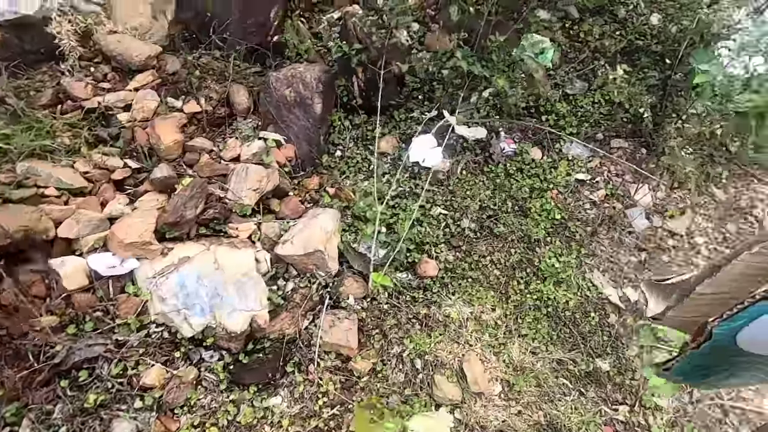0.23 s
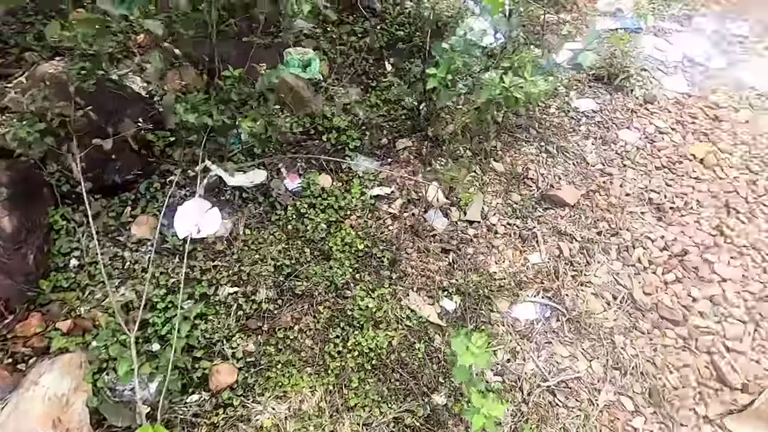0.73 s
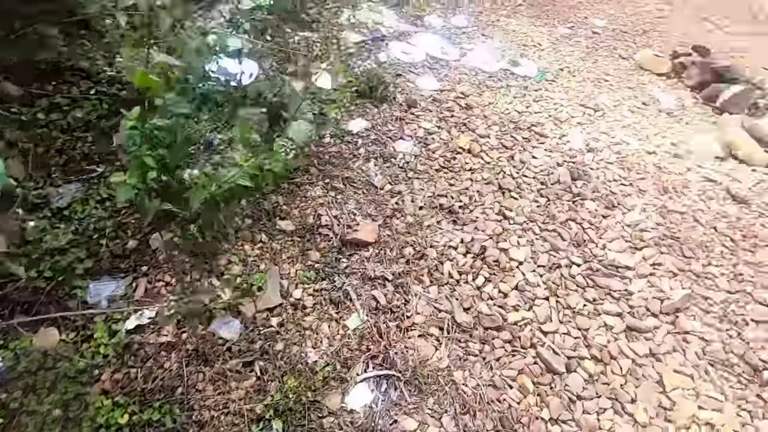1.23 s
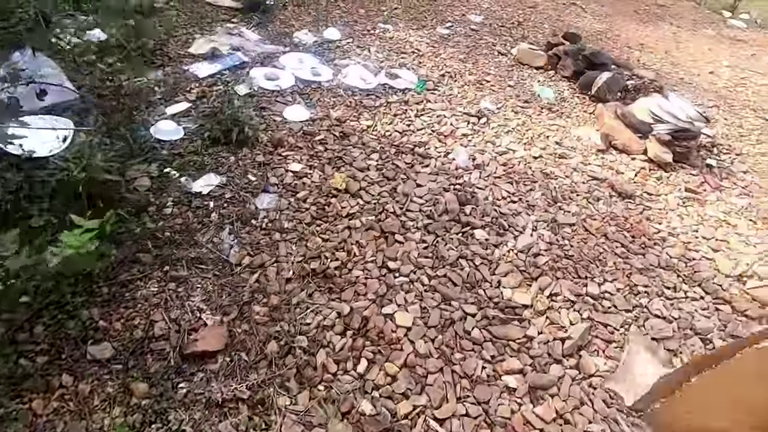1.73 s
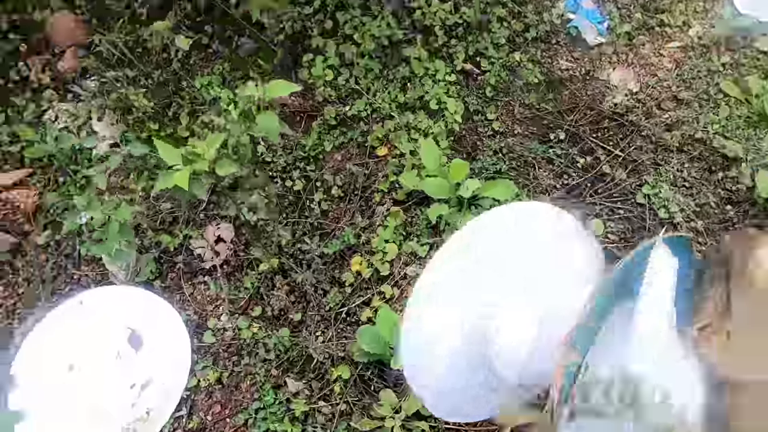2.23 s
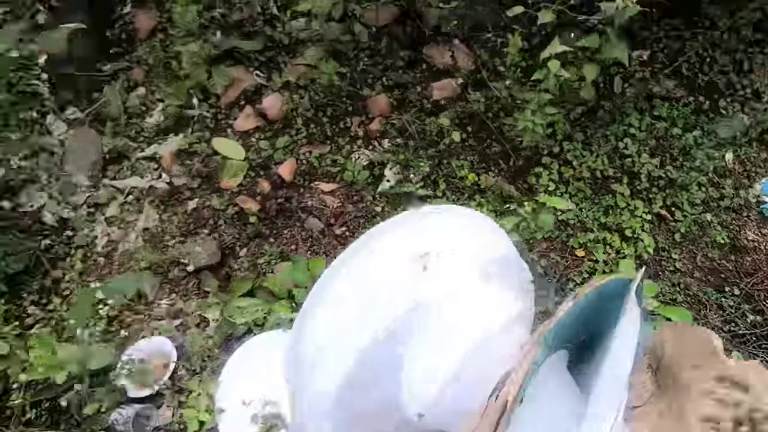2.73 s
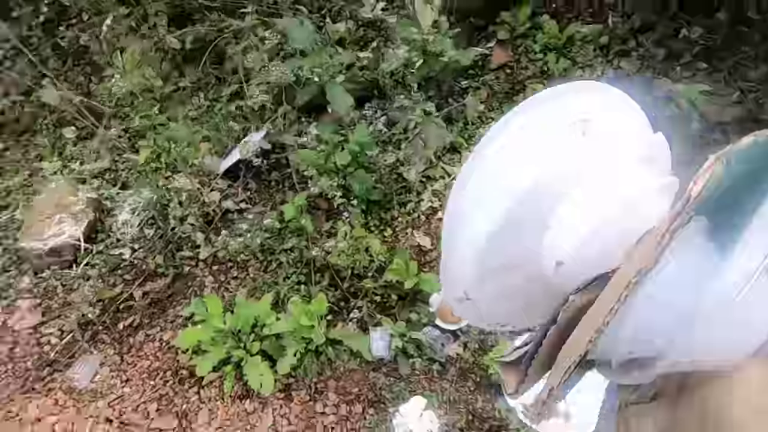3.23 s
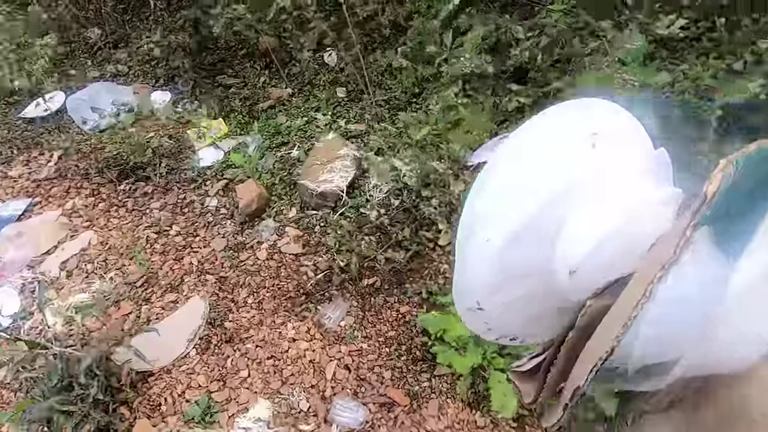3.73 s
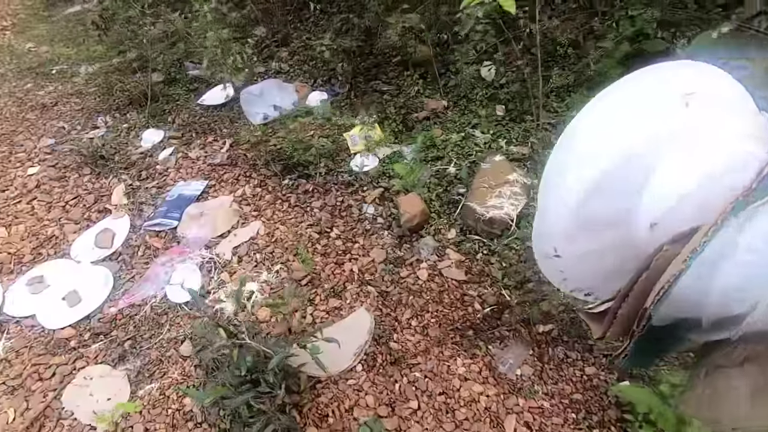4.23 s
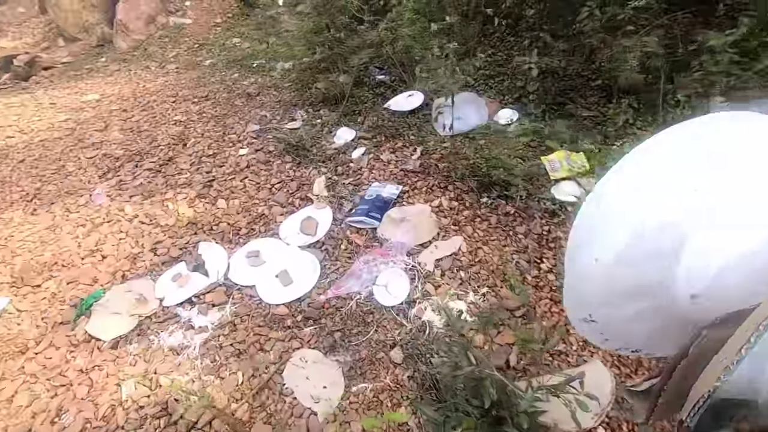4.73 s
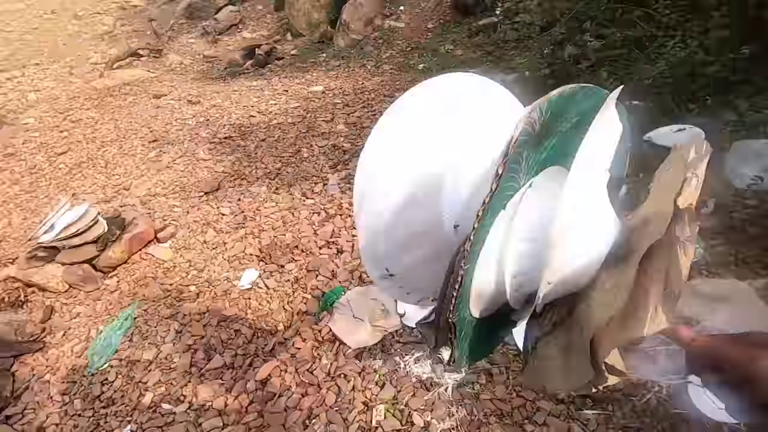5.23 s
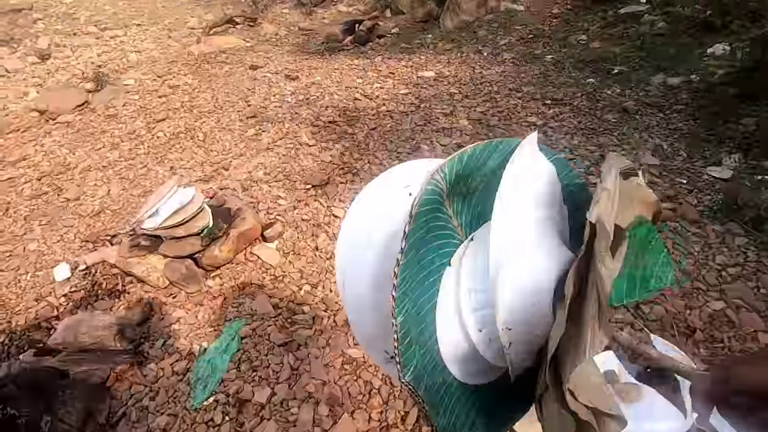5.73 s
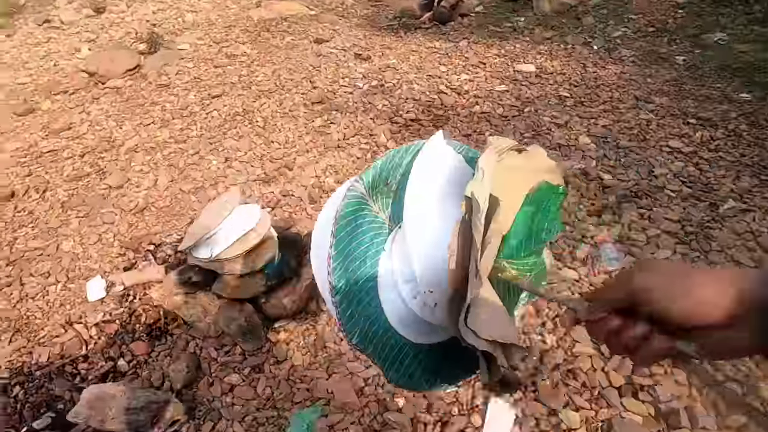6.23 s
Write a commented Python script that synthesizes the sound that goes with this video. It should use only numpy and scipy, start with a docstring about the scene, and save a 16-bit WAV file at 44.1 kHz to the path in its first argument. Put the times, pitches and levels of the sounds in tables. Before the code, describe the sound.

Someone walks on stony ground, faint at first, then crackling through litter and clacking stones, as wind thumps a small camera microphone.

```python
"""Footsteps over loose stones and weeds outdoors, someone carrying a stack of paper plates near a small camera.
Gravel grinds as small ringing grains and low noise; grit and paper crackle as denser, brighter showers.
Stones knock as decaying modes and grit snaps as short noise bursts.
Wind buffets the two microphone ports as low noise and single swings of pressure;
behind it lie a steady hiss and a faint whistle, likely a far bird."""
import sys
import numpy as np
from scipy import signal
from scipy.fft import rfft, irfft
from scipy.io import wavfile
from scipy.ndimage import uniform_filter1d

SR = 44100
rng = np.random.default_rng(int(sys.argv[2]) if len(sys.argv) > 2 else 0)


def int16_out(signal):
    """Quantize to a 16-bit WAV file."""
    q = np.round(np.clip(np.atleast_2d(signal).T, -1, 1) * 32767)
    wavfile.write(sys.argv[1], SR, q.astype(np.int16))


N = 286429


def amp(db):
    """Decibels to linear gain."""
    return 10 ** (np.asarray(db) / 20)


def evened(x):
    """Scale each channel to rms 1."""
    return x / np.sqrt(np.mean(x ** 2, -1, keepdims=True) + 1e-20)


def noise():
    """Two unrelated channels of white noise."""
    return rng.standard_normal((2, N))


def read(points, size=N):
    """Spectrum table on the bins of an FFT of this size, interpolated over log frequency."""
    f_hz, value = np.transpose(points)
    bins_hz = np.fft.rfftfreq(size, 1 / SR)
    return np.interp(np.log(bins_hz + 1), np.log(f_hz + 1), value)


def curves(rows):
    """Each column after the time as a curve over the samples."""
    s, *columns = np.transpose(rows)
    t = np.arange(N) / SR
    return [np.interp(t, s, c) for c in columns]


def coloured(x, points):
    """Shape the spectrum by a dB table, then set rms 1."""
    return evened(irfft(rfft(x) * amp(read(points)), N))


def flicker(hz, depth_db):
    """Random gain from noise low-passed at hz, mean power 1."""
    b, a = signal.butter(2, hz, fs=SR)
    slow = signal.lfilter(b, a, rng.standard_normal(N))
    return evened(amp(depth_db * evened(slow)))


def add(mix, s, sound):
    """Mix a sound in from time s, cut at the end."""
    part = mix[:, round(s * SR):][:, :len(sound.T)]
    part += sound[:, :len(part.T)]


def tread():
    """Stones grind in ringing grains, the bed gives under the weight, grit and paper crackle."""
    # relative spectra: (frequency [Hz], density [dB per Hz])
    grind_spectrum = [(310, -74), (520, -4), (843, -0.5), (1410, -6.5), (1840, -22), (2200, -26),
                      (2860, -42), (4840, -120)]
    weight_spectrum = [(82, -83), (140, 1), (274, -0.5), (340, -1), (409, -3.5), (560, -11), (730, -14),
                       (1230, -120)]
    crackle_spectrum = [(1000, -4.5), (1700, -3.5), (2160, -3.5), (3500, -6), (4530, -8), (6030, -11.5),
                        (7470, -5), (9070, -14), (10400, -13), (13900, -39), (15500, -43)]
    # finest rustle of paper and leaves: (frequency [Hz], relative density [dB per Hz])
    fizz_spectrum = [(8500, -7), (11500, -6.5), (14200, -15), (15500, -30)]
    grinding, crackling, giving = load()
    jolts = flicker(38, 1.4)  # the layers surge together as the load shifts

    stones = rattle(542, 1975, cycles=1.4, per_s=60, hiss=0.75)
    grind = patchy(coloured(stones, grind_spectrum), 1.0) * grinding

    weight = coloured(noise(), weight_spectrum) * giving * flicker(33.7, 4.6)

    grit = rattle(1506, 8520, cycles=1.33, per_s=90, hiss=1.0)
    grit = grit + 1.53 * evened(grains(2000, 0.63, 0.94))
    crackle = patchy(coloured(grit, crackle_spectrum), 3.0) * crackling * flicker(160, 0.36)

    fizz_gain = amp(-30) * crackling ** 0.72  # grows less than the crackle
    fizz = coloured(noise(), fizz_spectrum) * fizz_gain * flicker(20, 1.9)
    return (grind + weight + crackle + fizz) * jolts


def load():
    """Gains of grinding, crackle and give: crunches swell, hold and die away over a faint shuffle."""
    # crunches of a foot in the gravel: (start [s], rise [s], hold [s], tail t60 [s],
    # grinding of stones [dB], crackle of grit and paper [dB], low give of the bed [dB])
    crunches = [(0.152, 0.07, 0.25, 0.71, -64, -61.5, -65.5),
                (0.941, 0.0074, 0.012, 0.55, -56.5, -65.5, -59),
                (0.988, 0.033, 0.028, 0.25, -60.5, -52.5, -60.5), (1.455, 0.08, .01, 0.36, -62.5, -65, -62),
                (1.62, 0.058, 0.045, 0.074, -51, -48, -50), (1.732, 0.11, 0.012, 0.31, -51.5, -51.5, -51),
                (2.048, 0.082, 0.048, 0.3, -49, -42.5, -55),
                (2.201, 0.017, 0.0085, 0.11, -66, -36.5, -47.5), (2.24, 0.012, 0.004, 0.13, -67, -45, -51),
                (2.268, 0.026, 0.0058, 0.5, -58, -42.5, -62), (2.32, 0.041, 0.059, 0.19, -55, -40.5, -52),
                (2.459, 0.011, 0.012, 0.05, -68, -43.5, -62), (2.558, 0.019, 0.23, 0.34, -71, -45, -77),
                (2.693, 0.036, 0.026, 0.29, -42, -39, -44), (2.766, 0.034, 0.04, 0.088, -48, -39, -57),
                (2.829, 0.048, 0.031, 0.069, -44.5, -36.5, -45.5),
                (3.435, 0.22, 0.22, 0.21, -51, -60.5, -58), (3.654, 0.081, 0.0089, 0.14, -48, -49, -49.5),
                (3.716, 0.081, 0.15, 0.16, -65, -61, -64), (4.364, 0.0059, 0.048, 0.12, -54, -58.5, -54),
                (4.398, 0.0042, 0.0053, 0.55, -42, -48.5, -47),
                (4.747, 0.0034, 0.021, 0.058, -45, -57, -55.5),
                (4.801, 0.012, 0.0057, 0.14, -51, -51, -48.5),
                (4.833, 0.0043, 0.0066, 0.051, -39, -52.5, -49), (4.845, .01, 0.052, 1, -51.5, -56.5, -58),
                (4.987, 0.031, 0.025, 0.53, -44, -47.5, -42.5),
                (5.249, 0.005, 0.0054, 0.48, -57.5, -54.5, -55.5),
                (5.617, 0.002, 0.0063, 0.43, -43.5, -44.5, -42.5),
                (6.109, 0.039, 0.031, 0.064, -40.5, -45.5, -35),
                (6.165, 0.0091, 0.007, 0.02, -30.5, -38.5, -34.5),
                (6.184, 0.022, 0.009, 0.16, -52, -52.5, -65)]
    # gravel shifting between crunches: (time [s], grinding [dB], crackle [dB], give [dB])
    shuffle = [(0.0, -79, -64.5, -68), (0.9, -78.5, -73.5, -103), (1.15, -61.5, -62.5, -66),
               (1.45, -79, -69.5, -74), (2.03, -75, -70, -67), (2.9, -66, -45, -61),
               (2.94, -55.5, -57.5, -64), (3.1, -65.5, -65.5, -91), (3.25, -60.5, -70, -74),
               (3.45, -67.5, -68, -81), (4.03, -71, -74, -72.5), (4.35, -64, -64, -61.5),
               (4.74, -74, -69.5, -82), (5.3, -65.5, -63.5, -76), (6.07, -65.5, -62, -59),
               (6.49, -64, -58.5, -60.5)]
    rise_power = 0.94
    power = amp(curves(shuffle)) ** 2
    t = np.arange(2 * SR) / SR
    for s, rise_s, hold_s, t60_s, *db in crunches:
        swell = np.minimum(t / max(rise_s, .002), 1) ** rise_power
        tail = amp(-60 * np.maximum(t - rise_s - hold_s, 0) / max(t60_s, .01))
        add(power, s, (amp(db)[:, None] * swell * tail) ** 2)
    return np.sqrt(power)


def rattle(low_hz, high_hz, cycles, per_s, hiss):
    """Small objects of nine graded sizes, each ringing a few cycles when jostled."""
    out, t = np.zeros((2, N)), np.arange(700) / SR
    for hz in np.geomspace(low_hz, high_hz, num=9):
        envelope = np.exp(-t * hz / cycles) * np.minimum(t * hz / cycles, 1)
        ring = np.sin(2 * np.pi * hz * t) * envelope
        struck = signal.oaconvolve(grains(per_s, 4.0, hiss), ring[None])[:, :N]
        out += evened(struck) * np.sqrt(hz)
    return evened(out)


def grains(per_s, spread_db, hiss):
    """Two unrelated showers of tiny impacts of uneven size over a dense hiss."""
    size_db = spread_db * np.minimum(rng.exponential(1, (2, N)), 4)
    size = amp(size_db) * rng.choice([-1., 1.], (2, N))
    hits = rng.random((2, N)) < per_s / SR
    return evened(size * hits) + hiss * noise()


def patchy(x, depth_db):
    """Bands some 350 Hz wide swell for some 30 ms, as other objects take their turn to ring."""
    z = signal.stft(x, nperseg=512, noverlap=384)[2]
    field = rng.standard_normal(z.shape[1:])  # frequency by time
    field = uniform_filter1d(uniform_filter1d(field, size=4, axis=0), size=11, axis=1)
    swelling = z * amp(depth_db * field / field.std())
    return evened(signal.istft(swelling, nperseg=512, noverlap=384)[1][:, :N])


def knocks():
    """Stones knock and the sole thuds: modes ring at each pitch, blurred by a rough contact."""
    # large stones are low: (time [s], nominal peak [dB], pitch [Hz], t60 [cycles of the pitch])
    hits = [(0.222, -41.5, 258, 6.2), (0.488, -50, 616, 11), (0.7795, -44, 1270, 8.7),
            (0.947, -43, 1200, 34), (0.949, -31, 244, 15.6), (0.966, -42, 1330, 22),
            (1.04, -29.5, 1050, 7.5), (1.048, -38, 2320, 15), (1.1403, -37.5, 1330, 21),
            (1.1676, -35.5, 850, 10), (1.6676, -34, 1400, 30), (1.7067, -26, 640, 4.4),
            (1.715, -33, 354, 16.4), (1.8129, -24.5, 856, 7.8), (1.856, -28, 730, 6.2),
            (1.903, -45, 1020, 17), (2.156, -42, 3480, 76), (2.229, -31, 1200, 34),
            (2.264, -34.5, 1155, 46), (2.414, -32.5, 2000, 66), (2.415, -32, 3170, 76),
            (2.673, -28.5, 2160, 40), (2.671, -24, 927, 37), (2.678, -24.5, 905, 29),
            (2.6894, -30.5, 2150, 96), (2.6877, -30, 1040, 23), (2.713, -28, 2220, 18),
            (2.738, -29.5, 973, 42), (2.75, -25.5, 1100, 35), (2.761, -25, 3500, 41),
            (2.762, -26.5, 1470, 31), (2.797, -20, 1230, 7.5), (2.8055, -29, 1217, 85),
            (2.8165, -31, 1360, 140), (2.8287, -24, 1430, 32), (2.8848, -27.5, 1540, 55),
            (2.884, -23.5, 2950, 39), (2.8997, -24, 1520, 38), (3.034, -40, 328, 22),
            (3.1243, -44, 730, 9.5), (3.202, -46.5, 1400, 18), (3.266, -44, 1030, 30),
            (3.341, -42, 1020, 15), (3.496, -45.5, 294, 34), (3.581, -33, 1310, 8.3),
            (3.7214, -21.5, 656, 12.4), (3.727, -35, 460, 23), (3.875, -29, 980, 5.8),
            (4.0028, -43.5, 1250, 12), (4.099, -42, 850, 15), (4.369, -23.5, 243, 3.3),
            (4.3709, -35, 1350, 11), (4.4098, -20.5, 1000, 10), (4.4506, -31.5, 1070, 12),
            (4.5282, -32.5, 1100, 11), (4.5769, -19, 1110, 6.2), (4.6375, -39, 786, 22),
            (4.752, -32, 1000, 7.5), (4.756, -25.5, 874, 19), (4.81, -39.5, 370, 19),
            (4.8105, -18, 1000, 13), (4.8412, -16, 1160, 11), (4.8529, -24, 860, 7.8),
            (4.874, -33, 1060, 9.7), (4.896, -23, 1440, 9.3), (4.9763, -24.5, 1220, 6.3),
            (4.984, -28, 1100, 6.5), (5.007, -29, 432, 16), (5.051, -26.5, 1150, 13),
            (5.146, -34.5, 920, 8.4), (5.196, -38.5, 1195, 29), (5.261, -27, 855, 13.4),
            (5.4372, -44, 1030, 11), (5.622, -24.5, 282, 7), (5.6175, -24, 700, 4.3),
            (5.6315, -21.5, 746, 9.9), (5.6588, -22, 925, 10.4), (5.69, -21.5, 900, 5.8),
            (5.7411, -33.5, 790, 13.5), (5.7932, -38, 1340, 16), (6.084, -37.5, 870, 17),
            (6.138, -21.5, 293, 8.3), (6.1385, -26.5, 780, 19), (6.153, -23, 620, 4.2),
            (6.174, -19, 1030, 6.8), (6.2213, -31.5, 780, 14), (6.246, -42, 915, 11)]
    # modes of a stone: (multiple of the pitch [ratio], level [dB])
    modes = [(1.001, -1.5), (1.55, -11), (2.6, -13.5), (4.1, -33)]
    rise_cycles = 0.84  # contact time
    out, t = np.zeros((2, N)), np.arange(4000) / SR
    for s, db, hz, t60_cycles in hits:
        rough = rng.standard_normal((2, len(t)))
        rough = evened(uniform_filter1d(uniform_filter1d(rough, size=50), size=50))
        ring = np.zeros(len(t))
        for k, mode_db in modes:
            decay = amp(mode_db - 60 * t * k * hz / max(t60_cycles, 4))
            ring += decay * np.sin(2 * np.pi * k * hz * t)
        ring = ring + 0.3 * ring * rough
        add(out, s, amp(db) * ring * np.minimum(t * hz / rise_cycles, 1))
    return out


def snaps():
    """Grit and twigs snap: a click of broad noise with a faint tail, alike at both ports."""
    # (time [s], nominal peak [dB], bright edge [dB])
    clicks = [(0.148, -50, -7), (0.311, -45, 7), (0.633, -50, 10), (0.696, -49.5, -14), (0.982, -39, -42),
              (1.139, -31, -14), (1.271, -50, -18), (1.427, -43.5, -4), (1.654, -26, 1), (1.7062, -31, -13),
              (1.787, -40, -12), (1.8416, -31.5, -18), (2.156, -29, -35), (2.399, -27, 5),
              (2.688, -25, -15), (2.723, -30, -30), (3.241, -50, -5), (3.495, -44, -21), (3.694, -44, -20),
              (3.721, -30.5, -10), (4.003, -53, -8), (4.085, -55, -6), (4.41, -32.5, -16),
              (4.587, -39, -24), (4.811, -41, -15), (4.88, -42, 4), (4.926, -40, 11), (5.006, -27, -8),
              (5.261, -40.5, -19), (5.618, -36, -24), (5.625, -23, 17), (5.656, -30, -19),
              (5.682, -31.5, -18), (5.722, -29.5, -34), (5.7418, -34.5, -25), (5.8193, -39, -18),
              (5.839, -25.5, -8), (5.858, -37.5, -16), (6.114, -37, -20), (6.1177, -28.5, -37),
              (6.1609, -25.5, -9), (6.174, -25.5, -22), (6.249, -41, -5)]
    # body of a snap: (frequency [Hz], relative level [dB])
    body_spectrum = [(900, -26), (1800, 4), (3200, 2.5), (5500, -13.5), (8000, -75)]
    # its bright edge: (frequency [Hz], relative level [dB])
    edge_spectrum = [(3500, -1), (5500, 9.5), (7500, 16), (10000, 5), (15000, -52)]
    crest_db = 4  # nominal peak above the burst's rms
    out, t = np.zeros((2, N)), np.arange(1024) / SR
    body, edge = amp(read(body_spectrum, size=1024)), amp(read(edge_spectrum, size=1024))
    attack = np.minimum(t / 0.00048, 1)
    decay = np.exp(-t / 0.0012) + 0.17 * np.exp(-t / 0.006)
    for s, db, edge_db in clicks:
        white = rng.standard_normal((1, len(t)))
        burst = evened(irfft(rfft(white) * (body + amp(edge_db) * edge)))
        add(out, s, amp(db - crest_db) * burst * attack * decay)
    return out


def wind():
    """Turbulence presses on each port by itself, in slow lumps and faster flutter."""
    # buffeting: (time [s], level [dB], flutter relative to the lumps [dB])
    buffeting = [(0.0, -17, 0.5), (0.07, -37.5, -24), (0.22, -36.5, -12.5), (0.29, -34.5, -5.5),
                 (0.55, -37, -6), (0.65, -55, -12.5), (1.03, -50, -9), (1.21, -30, -8.5),
                 (1.34, -39.5, -27), (1.43, -39.5, 2), (1.58, -42, -24), (1.75, -34, -6.5),
                 (1.95, -37.5, -36), (2.03, -33, 1), (2.2, -35, 2), (2.4, -58, -52), (2.64, -49.5, -22),
                 (2.73, -36, -22), (2.95, -36.5, -9), (3.23, -39, -14), (3.6, -34, -13.5), (3.95, -56, -37),
                 (4.21, -44.5, -18.5), (4.6, -30.5, 2), (4.88, -42, -24.5), (5.02, -25, -6.5),
                 (5.6, -36.5, 4.5), (5.9, -39.5, -2.5), (6.25, -30.5, -13), (6.36, -39, -31),
                 (6.49, -38.5, -29)]
    # slow lumps: (frequency [Hz], relative density [dB per Hz])
    lump_spectrum = [(7.1, -27), (12, -5), (36, 7.5), (55, 0.5), (83, -13), (130, -24.5), (170, -29),
                     (290, -120)]
    # fast flutter: (frequency [Hz], relative density [dB per Hz])
    flutter_spectrum = [(47, -2), (80, 2), (109, 1), (173, -11.5), (253, -25.5), (323, -26), (420, -39.5),
                        (550, -45), (920, -120)]
    level_db, flutter_db = curves(buffeting)
    lumps = coloured(noise(), lump_spectrum)
    fast = coloured(noise(), flutter_spectrum) * [flicker(29, 2), flicker(23, 2)]
    eddies = [flicker(5, 3.5), flicker(6, 3.5)]
    return amp(level_db) * (lumps + amp(flutter_db) * fast) * eddies


def thumps():
    """Single eddies thump the ports: a swing or two of pressure, each port at its own phase."""
    # (centre [s], nominal peak [dB], pitch [Hz], left minus right [dB])
    swings = [(0.011, -22, 65, -22), (0.294, -21.5, 62.7, -5), (0.317, -16, 53, 29),
              (0.404, -18.5, 55.4, -13), (0.465, -27, 75, -17), (0.531, -22, 71.4, 29),
              (1.11, -30.5, 67.6, -25), (1.733, -32.5, 63.4, -5), (2.046, -27.5, 73.5, -14),
              (2.066, -25, 80.4, 0), (2.133, -27, 59.4, -22), (2.182, -22.5, 104, -20),
              (2.198, -30, 69, 16), (2.728, -24, 52, 31), (4.594, -25.5, 84, 12), (4.622, -22, 79, -3),
              (4.677, -32, 54, 20), (5.176, -21, 55.3, -15), (5.2, -28, 58.3, 13), (5.23, -34, 56, -1),
              (5.242, -23, 68.4, 1), (5.285, -19.5, 72, 16), (5.47, -18, 67.5, 19), (5.559, -18.5, 81, 33),
              (5.883, -22, 54.5, -35), (6.216, -29, 56, 18), (6.258, -22, 61.3, 29)]
    out = np.zeros((2, N))
    for s, db, hz, pan_db in swings:
        turns = np.arange(round(2.2 * SR / hz)) * hz / SR
        phase_turns = rng.random((2, 1))
        swing = np.sin(2 * np.pi * (turns + phase_turns)) * np.hanning(len(turns))
        start_s = max(s - len(turns) / SR / 2, 0)
        add(out, start_s, amp(db) * split(pan_db)[:, None] * swing)
    return out


def split(pan_db):
    """Gains of the two ports, mean power 1."""
    sides = amp(np.array([pan_db, -pan_db]) / 2)
    return sides / np.sqrt((sides ** 2).mean(0))


def bird():
    """A faint falling whistle, likely a far bird: a thin, unsteady gliding tone."""
    # (time [s], pitch [Hz], level [dB])
    whistle = [(3.092, 2210, -73), (3.11, 2130, -73), (3.14, 1850, -68), (3.2, 1800, -65)]
    hz, db = curves(whistle)
    t = np.arange(N) / SR
    sounding = (t > whistle[0][0]) * (t < whistle[-1][0])
    tone = np.sin(2 * np.pi * np.cumsum(hz) / SR)
    return amp(db) * flicker(120, 5.1) * tone * sounding


def air():
    """Far outdoor hiss: steady coloured noise."""
    # (frequency [Hz], relative density [dB per Hz])
    hiss_spectrum = [(88, -20), (150, 4), (248, -6), (530, -25), (1340, -15), (2140, -26), (3910, -17.5),
                     (4480, -18.5), (9360, -20), (12300, -39), (15500, -51)]
    level_db = -73.5
    return amp(level_db) * coloured(noise(), hiss_spectrum)


def ports(pair):
    """The right port hears the first signal; the left a shaded, phase-shifted blend with the second."""
    # the camera body shades the left port: (frequency [Hz], left minus right [dB])
    shade_db = [(60, 6), (110, 2), (200, -3), (380, 1.5), (700, -7), (1290, -13), (2380, -7.5),
                (4400, -5.0), (8120, -5), (15000, 4.5)]
    # (frequency [Hz], phase by which the left port leads [rad])
    lead_rad = [(450, 0), (860, -.7), (1150, .9), (1700, .8), (3900, 0), (5300, -1.6), (7000, -1.5),
                (12000, -3.7)]
    # (frequency [Hz], likeness of the ports [0-1])
    likeness = [(200, 1), (600, 0.74), (1400, 0.27), (3000, 0.51), (7000, 0.12), (14000, 0.17)]
    a, b = rfft(pair)
    same, shade = np.clip(read(likeness), 0, 1), amp(read(shade_db))
    blend = same * a + np.sqrt(1 - same ** 2) * b
    left = shade * np.exp(1j * read(lead_rad)) * blend
    balance = 2 / np.sqrt(1 + shade ** 2 + shade)
    return irfft(np.array([left, a]) * balance, N)


def scene():
    """Sounds in the air pass through both ports; wind presses on each directly."""
    airborne = tread() + knocks() + snaps() + air() + bird()
    return ports(airborne) + wind() + thumps()


def record(dry):
    """A quick fade-in and a steep low-pass."""
    fade_s, edge_hz = .003, 15400
    faded = dry * np.minimum(np.arange(N) / (fade_s * SR), 1)
    lowpass = signal.firwin(511, edge_hz, window=("kaiser", 9), fs=SR)
    return signal.oaconvolve(faded, lowpass[None], "same")


dry = scene()
out = record(dry)
int16_out(out)
```